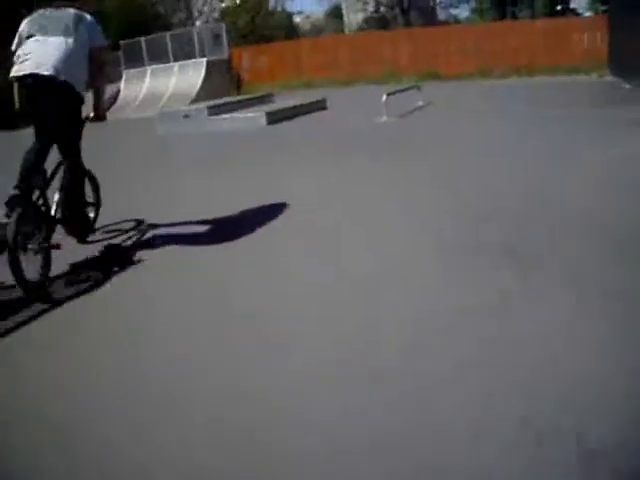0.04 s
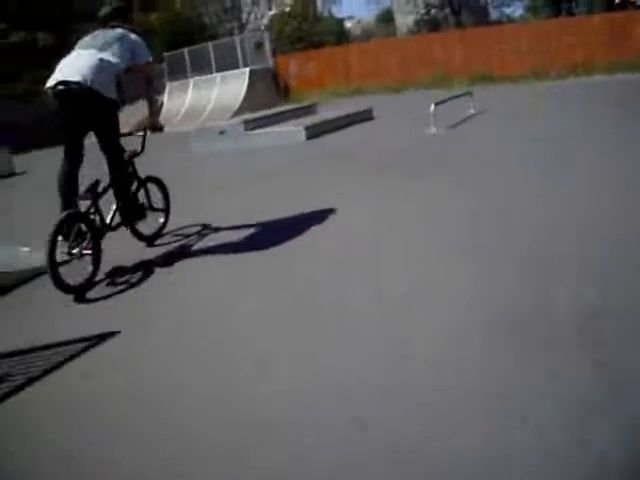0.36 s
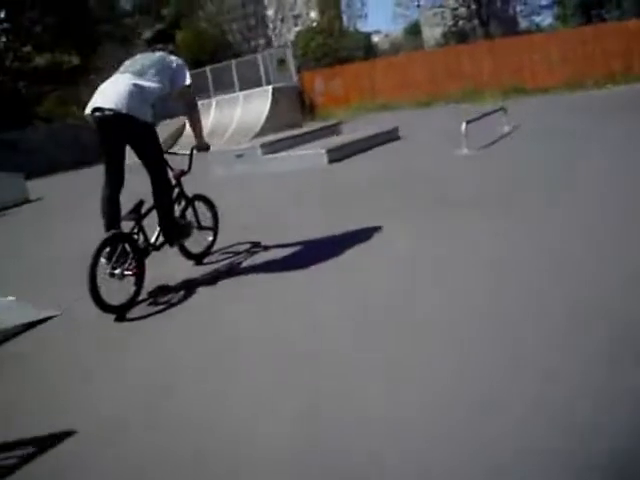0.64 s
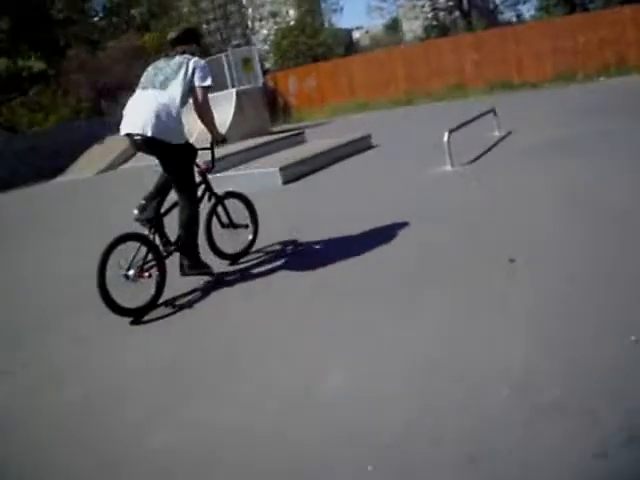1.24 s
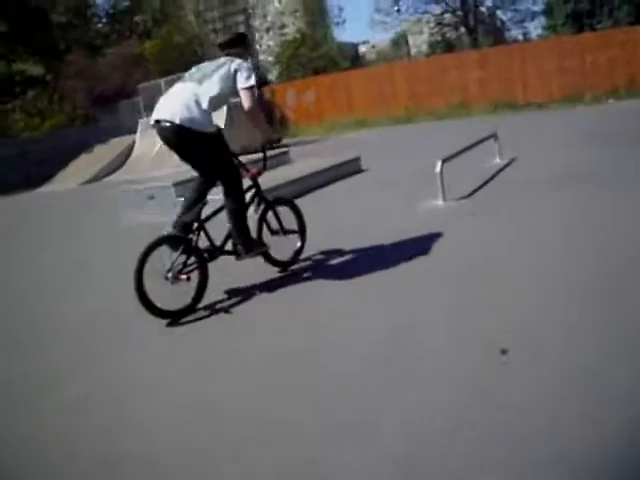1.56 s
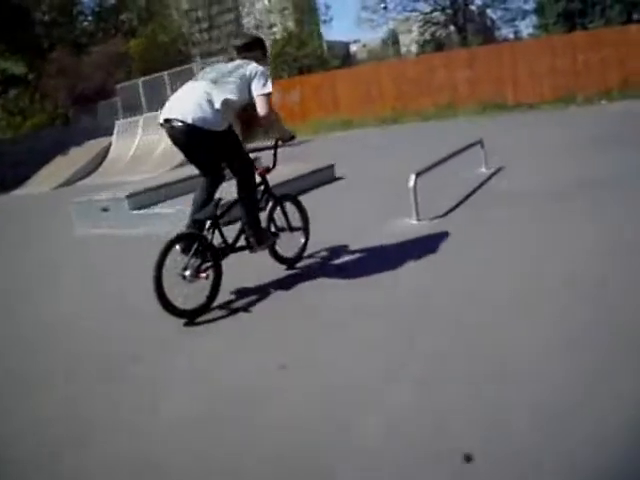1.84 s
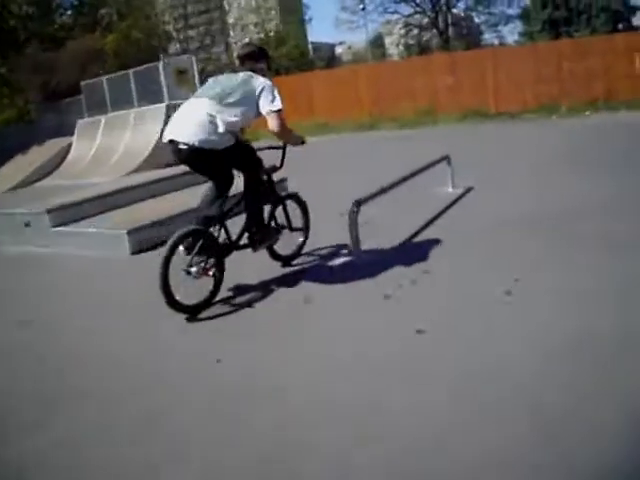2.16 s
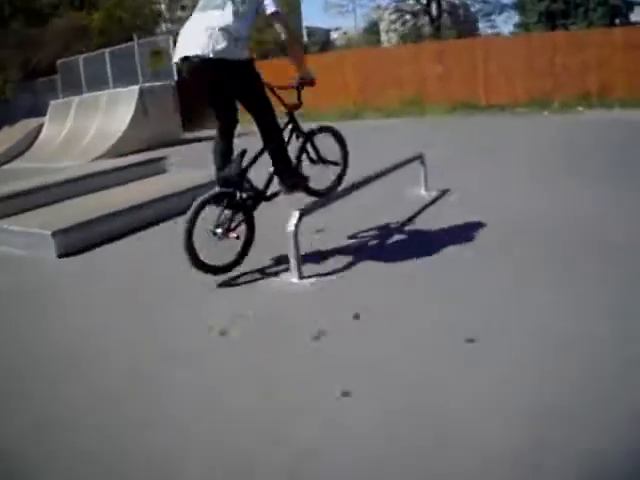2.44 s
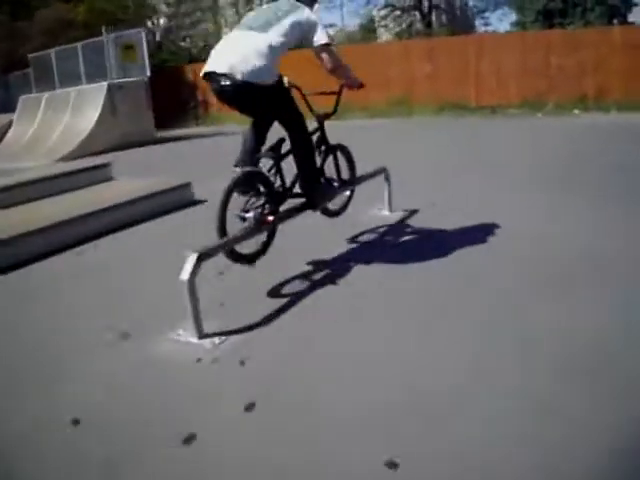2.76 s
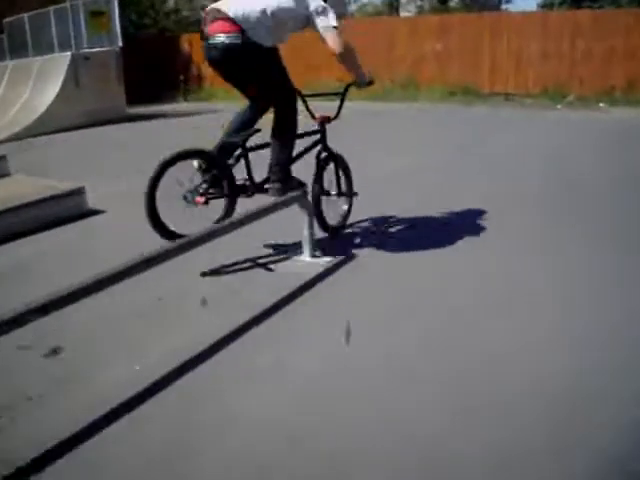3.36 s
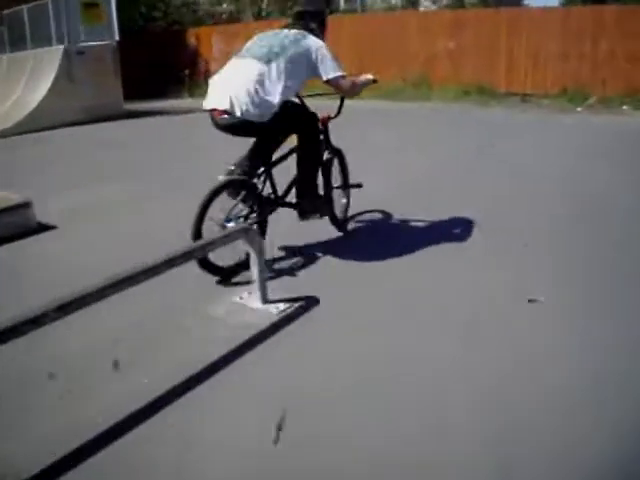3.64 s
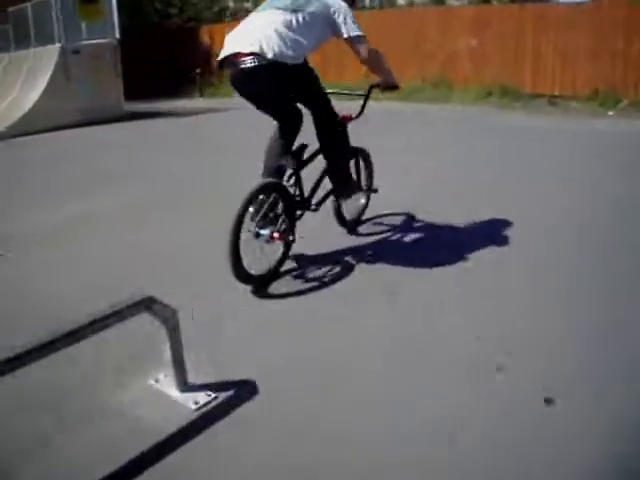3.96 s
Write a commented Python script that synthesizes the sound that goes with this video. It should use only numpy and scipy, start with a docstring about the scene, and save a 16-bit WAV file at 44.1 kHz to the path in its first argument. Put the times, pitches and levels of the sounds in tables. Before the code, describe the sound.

A stunt bike coasts over concrete with hissing tyres and a faintly ticking freewheel, then slams onto a steel rail, grinds briefly and clanks off, leaving it ringing. Wind buffets the small microphone in an open skatepark.

```python
"""In an open park, a stunt bike coasts over concrete while wind buffets a small camera's microphone.
The tyres hiss and the freewheel ticks. Then the bike's two pegs slam onto a steel rail and grind
along it, catching on the metal many times a second. A last clank sets the freed rail ringing and the
wheels land. The loudest blows overload the recorder, which also cuts off the high treble."""
import sys
import numpy as np
from scipy import signal
from scipy.fft import rfft, irfft
from scipy.io import wavfile
from scipy.ndimage import uniform_filter1d

SR = 44100
rng = np.random.default_rng(int(sys.argv[2]) if len(sys.argv) > 2 else 0)


def to_wav(sig):
    """Store sig (one row per channel, or 1-D mono) as 16-bit WAV at the path in sys.argv[1].

    Samples outside -1..1 are clipped; the rate is SR.
    """
    pcm = np.clip(np.atleast_2d(sig), -1, 1) * 32767
    pcm = np.round(pcm).astype(np.int16)
    wavfile.write(sys.argv[1], SR, pcm.T)  # frames by channels


N = 176400
T = np.arange(N) / SR

# loudness of the tyre and air hiss: t/s, level/dB
HISS_LEVEL = [(0, -38), (.45, -35), (.6, -38), (1.3, -39), (1.6, -36), (2, -38), (4, -36)]
# the tyres' fine sizzle, swelling as the bike is pushed on: t/s, level/dB
SIZZLE_LEVEL = [(0, -41.5), (.45, -52), (.8, -50.5), (1.4, -57.5), (1.48, -45), (1.8, -53.5)]
# tone of the hiss and of the sizzle: f/Hz, level/dB
HISS_TONE = [(30, 5), (200, 7), (500, 4), (900, -0.5), (1250, -1), (1650, -3), (2100, 1.5), (2450, 3.5),
             (2800, 0), (3050, 0.5), (3300, -3.5), (4000, -8), (4800, -29.5)]
SIZZLE_TONE = [(1200, -23.5), (3600, 4), (5000, -18)]
# strength of the wind's gusts and of its rough, higher flutter: t/s, level/dB
GUST_LEVEL = [(0, -28), (.04, -14), (.065, -66.5), (.125, -37), (.21, -24), (.235, -23), (.32, -16.5),
              (.36, -26), (.43, -22.5), (.475, -46.5), (.525, -22.5), (.555, -50.5), (.61, -43),
              (.68, -16.5), (.74, -20.5), (.775, -15), (.84, -18), (.87, -24), (.91, -17.5), (.96, -28.5),
              (1.0, -23), (1.055, -48), (1.095, -17.5), (1.13, -37.5), (1.165, -17.5), (1.22, -36.5),
              (1.29, -16.5), (1.32, -25.5), (1.375, -18), (1.41, -25.5), (1.45, -16), (1.495, -34),
              (1.53, -20.5), (1.6, -23), (1.66, -12.5), (1.69, -22), (1.755, -13), (1.79, -30.5),
              (1.85, -16.5), (1.91, -28.5), (2.01, -16.5), (2.06, -24), (2.2, -19), (2.6, -19), (2.75, -23),
              (2.93, -23.5), (3.0, -24.5), (3.15, -33.5), (3.4, -36), (3.5, -29.5), (3.6, -27), (3.64, -36),
              (3.69, -24.5), (3.75, -31), (3.8, -55), (3.84, -33), (3.92, -50.5), (4.0, -26.5)]
FLUTTER_LEVEL = [(.15, -60), (.33, -30.5), (.42, -31.5), (.47, -55), (.62, -63), (.72, -34), (.8, -26),
                 (.9, -40), (1.33, -45.5), (1.52, -35), (1.6, -24), (1.7, -19.5), (1.86, -34.5),
                 (1.92, -29), (2.02, -37), (2.06, -31.5), (2.22, -27.5), (2.4, -26), (2.9, -42.5)]
# tone of the wind's buffeting, flutter and rumble: f/Hz, level/dB
BUFFET_TONE = [(15, -38.5), (30, -23), (60, -12.5), (120, -2), (180, -1), (260, -3), (400, -12.5),
               (600, -19), (1200, -54.5), (3000, -87)]
FLUTTER_TONE = [(60, -24.5), (200, -13.5), (350, 1.5), (600, -5), (900, -10.5), (1300, -19), (2000, -33),
                (4000, -60)]
RUMBLE_TONE = [(12, -14), (30, -9), (60, -2), (110, 3), (200, -12.5), (500, -50.5)]
# swirls of air popping on the microphone: t/s, level/dB, f/Hz
WIND_POPS = [(.006, -12, 300), (.036, -16, 256), (.102, -14, 104), (.238, -6.5, 202), (.360, -9.5, 464),
             (0.4064, -6, 950), (0.527, -17.5, 295), (.774, -10.5, 273), (.8078, -11.5, 480),
             (.849, -8, 430), (.8935, -20, 564), (1.085, -10, 94), (1.103, -14, 300), (1.159, -16.5, 229),
             (1.338, -10.5, 320), (1.561, -15, 647), (1.577, -6.5, 566), (1.6, -12, 600), (1.641, -6, 610),
             (1.659, -7.5, 298), (1.681, -9, 910), (1.744, -12.5, 450), (1.781, -9, 656), (1.801, -9, 534),
             (2.049, -13, 800), (2.082, -11, 613), (2.111, -16, 617), (2.191, -12.5, 650),
             (2.231, -10, 560), (2.267, -10, 322), (2.4357, -16, 750), (2.4825, -9, 550),
             (2.669, -12.5, 418)]
# faint squeaks: t/s, level/dB, f/Hz
SQUEAKS = [(1.014, -31.5, 958), (1.878, -27, 752)]
# chain and peg ticks: t/s, level/dB, body f/Hz, ping f/Hz, ping level/dB against the body, ping decay/s
TICKS = [(.755, -17, 2500, 1950, 1, .0017), (2.931, -10, 330, 1100, -7, .0008),
         (2.953, -13, 400, 1200, -5, .0008), (3.1212, -5, 560, 2450, -3, .0008),
         (3.5205, -6, 650, 2600, -10, .0006)]
# metal blows and landings: t/s, clatter level/dB, clatter decay/s, clatter cutoff f/Hz,
# clang f/Hz, clang level/dB, clang decay/s
BLOWS = [(2.7414, -8.5, 0.013, 5910, 1298, 4, 0.0055), (2.758, -27.5, 0.0026, 3500, 1074, -1, 0.0034),
         (2.7678, -3.5, 0.014, 3810, 920, 2, .003), (2.7775, -5, 0.007, 4180, 395, -5, .01),
         (2.7833, -17, 0.0041, 3000, 1220, -3, 0.0097), (2.7908, -11.5, 0.0099, 3000, 1366, -11, 0.0051),
         (3.2325, -24, .0051, 2500, 712, -11.5, 0.011), (3.2496, -11, 0.027, 2716, 710, 3.5, 0.0017),
         (3.2565, -28, .028, 2790, 521, 2.5, .0022), (3.444, -20.5, .0057, 2940, 1345, -8.5, .0047),
         (3.445, -20.5, 0.015, 2600, 815, -7, 0.0031), (3.5196, -5.5, 0.0034, 1420, 593, -10.5, 0.0046)]
# tone of the blows' clatter and of the pegs' scraping: f/Hz, level/dB
CLATTER_TONE = [(40, -10.5), (200, 1), (800, 4), (1300, 2), (2000, -3), (2800, -3), (3600, -6), (4600, -31)]
SCRAPE_TONE = [(60, -13.5), (200, 0.5), (750, 1), (1100, 0), (1400, -6), (1650, -14), (2300, -10.5),
               (2900, -10), (3300, -17), (4500, -31.5)]
# loudness of the grind as the pegs press on the rail: t/s, level/dB
GRIND_LEVEL = [(2.765, -41), (2.785, -26), (2.83, -24), (2.9, -24), (2.98, -23.5), (3.08, -29.5),
               (3.16, -25), (3.23, -22.5), (3.28, -21.5), (3.33, -33), (3.45, -34), (3.55, -26),
               (3.65, -40), (3.8, -43.5)]
# notes of peg and rail pressed together: f/Hz, level/dB
CONTACT_NOTES = [(598, 0), (858, -5), (1127, -1), (1222, -1), (1352, 4), (1741, 3), (1952, 5.5), (2391, 1),
                 (2597, 2), (2857, 2.5)]
# notes of the free rail: f/Hz, level/dB, time/s to fade by 60 dB
RAIL_NOTES = [(592, -28, .9), (742, -28, .8), (824, -22, 1.0), (1021, -26, 2.7), (1071, -25, .75),
              (1198, -22, 2.3), (1270, -34, 2.1), (1345, -36, 1.1), (1556, -31, 1.1), (1646, -34, 2.6),
              (1945, -28, .55), (2320, -32, .8), (2725, -29, 1.8), (2995, -38, 3.8), (3020, -42, 1.1),
              (3053, -31, 1.9), (3505, -38, .7), (3801, -47, 1.2)]
# blows that ring the free rail: t/s, level/dB, centre f/Hz, reach/octaves around that centre
RAIL_STRIKES = [(3.251, 2.5, 1370, 2.7), (3.446, 3.5, 977, 0.098), (3.521, -8.5, 2920, 0.97)]
# the rail's ring, which dips briefly near the end and comes back louder: t/s, level/dB
RING_LEVEL = [(3.6, -0.5), (3.89, -0.5), (3.95, -10), (3.99, 5.5)]


def amp(db):
    """Turns decibels into a factor to multiply by."""
    return 10 ** (np.asarray(db) / 20)


def unit(x):
    """Scales a sound to an average power of 1."""
    return x / np.sqrt(np.mean(x ** 2) + 1e-20)


def level(points):
    """A loudness curve through (t/s, level/dB) points."""
    return amp(np.interp(T, *np.transpose(points)))


def colour(x, points):
    """Gives a sound the tone drawn by (f/Hz, level/dB) points, at power 1."""
    hz, db = np.transpose(points)
    curve_db = np.interp(np.log(np.fft.rfftfreq(N, 1 / SR) + 1), np.log(hz), db)
    return unit(irfft(rfft(x) * amp(curve_db), N))


def steady(x, size):
    """Evens out chance swells longer than size samples."""
    return x / np.sqrt(uniform_filter1d(uniform_filter1d(x ** 2, size), size) + 1e-6)


def clicks(per_s, spread_db):
    """Random clicks of uneven strength."""
    strength = amp(spread_db * np.minimum(rng.exponential(1, N), 4))
    return unit(strength * rng.choice([-1, 1], N) * (rng.random(N) < per_s / SR))


def drift(size):
    """A random wobble, smoothed over size samples."""
    return unit(uniform_filter1d(rng.standard_normal(N), size))


def since(s):
    """Seconds passed since time s, zero before."""
    return np.maximum(T - s, 0)


def struck(s, decay_s, attack_s=.0009):
    """The loudness of a hit: a quick rise, then a fade."""
    rise = np.minimum(since(s) / attack_s, 1)
    return rise * np.exp(-np.minimum(since(s + attack_s) / decay_s, 20))


def puff(s, hz):
    """One dip of air pressure with its rebound, strongest near hz."""
    u = np.minimum((np.pi * hz * (T - s)) ** 2, 20)
    return (2 * u - 1) * np.exp(-u)


def lowpass(x, hz, size):
    """Cuts away the sound above hz."""
    return signal.oaconvolve(x, signal.firwin(size, hz, window=("kaiser", 9), fs=SR), "same")


def resonate(x, hz, width_hz):
    """Makes a sound ring at the moving pitch hz; a smaller width rings longer."""
    turn = np.exp(2j * np.pi * np.cumsum(hz) / SR)
    fade = np.exp(-np.pi * width_hz / SR)
    return unit((turn * signal.lfilter([1 - fade], [1, -fade], x / turn)).real)


def park_echoes(x, fade_s=.7):
    """Adds thin, scattered echoes from ramps and fence."""
    t = T[:SR]
    tail = clicks(per_s=2100, spread_db=5.6)[:SR] * np.minimum(t / .023, 1) * amp(-60 * t / fade_s)
    return x + amp(-12.5) * signal.oaconvolve(x, tail / np.linalg.norm(tail))[:N]


def tyre_hiss():
    """Tyres on concrete and the open air make a grainy hiss with a fine sizzle on top."""
    sizzle = colour(rng.standard_normal(N), SIZZLE_TONE) * level(SIZZLE_LEVEL)
    grain = rng.standard_normal(N) + .5 * clicks(per_s=900, spread_db=2.9)
    return sizzle + colour(grain, HISS_TONE) * level(HISS_LEVEL)


def wind():
    """Air swirls over the microphone in low puffs, flutter and single pops, above a deep rumble."""
    gust = level(GUST_LEVEL)
    puffs = colour(clicks(per_s=170, spread_db=3) + .5 * rng.standard_normal(N), BUFFET_TONE)
    gust_db = 20 * np.log10(uniform_filter1d(gust, size=2000) + 1e-6)
    swirl_hz = 159.8 * 2 ** (.3 * (gust_db + 19))  # stronger gusts ring higher
    buffet = steady(puffs + amp(-3) * resonate(puffs, swirl_hz, width_hz=45), size=900) * gust
    small_swirls = colour(clicks(per_s=700, spread_db=1.5), FLUTTER_TONE)
    flutter = steady(small_swirls, size=1100) * level(FLUTTER_LEVEL)
    swell = uniform_filter1d(gust / gust.mean(), size=4000) ** .22  # follows the gusts only a little
    rumble = amp(-33) * steady(colour(rng.standard_normal(N), RUMBLE_TONE), size=4000) * swell
    pops = sum(amp(db) * puff(s, hz) for s, db, hz in WIND_POPS)
    return buffet + flutter + rumble + pops


def freewheel(clicks_per_s=87, ring_s=.004, coast_end_s=2.75):
    """While the rider coasts, small catches in the hub click over its teeth with a wavering ring."""
    teeth_passed = np.cumsum(clicks_per_s * (1 + .04 * drift(9000))) / SR
    hits = np.diff(np.floor(teeth_passed), prepend=0) * (T < coast_end_s)
    hits *= amp(3.5 * rng.standard_normal(N))
    ring_hz = 3060 + 45 * drift(4000)
    return amp(-47) * resonate(hits, ring_hz, width_hz=1 / (np.pi * ring_s))


def squeaks(swell_s=.017, rise_per_s=3.4):
    """Short, soft tones that slide upwards."""
    out = np.zeros(N)
    for s, db, hz in SQUEAKS:
        t = T - s
        swell = np.exp(-np.minimum((t / swell_s) ** 2, 20))
        out += amp(db) * swell * np.sin(2 * np.pi * hz * t * (1 + rise_per_s * t / 2))
    return out


def ticks(ping_delay_s=.0009):
    """Chain and pegs tick: each is a short push of air with a tiny ping on top."""
    out = np.zeros(N)
    for s, db, body_hz, ping_hz, ping_db, decay_s in TICKS:
        ping_at = s + ping_delay_s
        ping = np.sin(2 * np.pi * ping_hz * since(ping_at)) * struck(ping_at, decay_s)
        out += amp(db) * (puff(s, body_hz) + amp(ping_db) * ping)
    return out


def contact_ring(x, fade_s=.12):
    """Peg and rail ring only briefly while pressed together; the result is as strong as x."""
    t = T[:SR // 2]
    ring = sum(amp(db - 60 * t / fade_s) * np.cos(2 * np.pi * hz * t) for hz, db in CONTACT_NOTES)
    return np.std(x) * unit(signal.oaconvolve(x, ring)[:N])


def blows():
    """Each blow is a dense clatter, bright or dull, that shakes the steel, plus one short clang."""
    clatter, clang = np.zeros((2, N))
    crunch = steady(colour(rng.standard_normal(N), CLATTER_TONE), size=130)
    for s, clatter_db, clatter_s, cutoff_hz, clang_hz, clang_db, clang_s in BLOWS:
        dulled = signal.lfilter(*signal.butter(2, cutoff_hz, fs=SR), crunch)
        clatter += amp(clatter_db) * struck(s, clatter_s) * dulled
        angle = 2 * np.pi * clang_hz * since(s)
        tone = np.sin(angle) + amp(-20) * np.sin(2.76 * angle)  # a note and its faint overtone
        clang += amp(clang_db) * tone * struck(s, clang_s)
    return clatter + amp(-11) * contact_ring(clatter) + clang


def grind():
    """The sliding pegs catch on the steel many times a second and make it ring briefly."""
    snags = clicks(per_s=2500, spread_db=2.5)
    scrape = steady(colour(snags, SCRAPE_TONE), size=900)
    return unit(scrape + amp(-5) * contact_ring(scrape)) * level(GRIND_LEVEL)


def rail_ring():
    """Free of the pegs, the tube rings on. Each note throbs against a quieter, slightly higher twin."""
    out = np.zeros(N)
    for s, strike_db, centre_hz, reach in RAIL_STRIKES:
        start = round(s * SR)
        t = T[:N - start]
        for hz, db, fade_s in RAIL_NOTES:
            twin_hz = hz + 6 * rng.uniform(.48, 1.7) * hz / centre_hz
            twin = amp(-13) * np.sin(2 * np.pi * (twin_hz * t + rng.random()))
            note = np.sin(2 * np.pi * hz * T[start:])
            share = np.exp(-(np.log2(hz / centre_hz) / reach) ** 2)  # most for notes near the centre
            out[start:] += amp(strike_db + db - 60 * t / fade_s) * share * (note + twin)
    return out * level(RING_LEVEL)


def scene():
    """Bike and rail in the open park, with wind on the microphone."""
    short_sounds = park_echoes(blows() + ticks() + freewheel() + squeaks())
    return (short_sounds + grind() + rail_ring() + wind() + tyre_hiss())[None]


def record(dry, overload=.97, ceiling=.94):
    """The recorder squashes loud peaks, cuts the high treble and clips the peaks that remain."""
    squashed = dry[0] / (1 + (dry[0] / overload) ** 12) ** (1 / 12)
    narrow = lowpass(squashed, hz=4840, size=255)
    clipped = np.clip(narrow, -ceiling, ceiling)
    return lowpass(clipped, hz=15500, size=511)[None]


dry = scene()
out = record(dry)
to_wav(out)
```